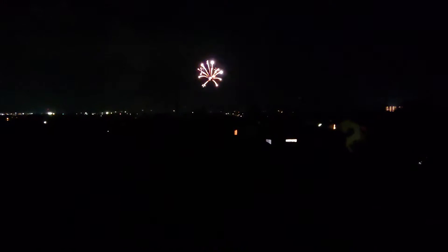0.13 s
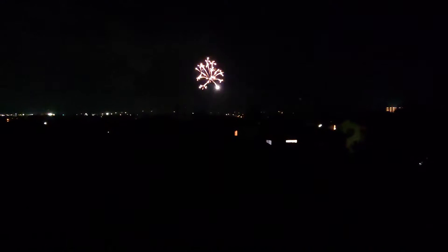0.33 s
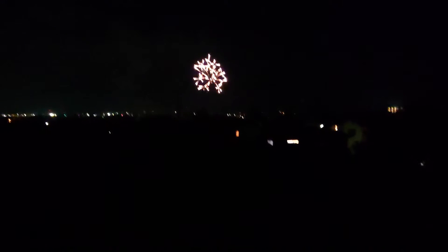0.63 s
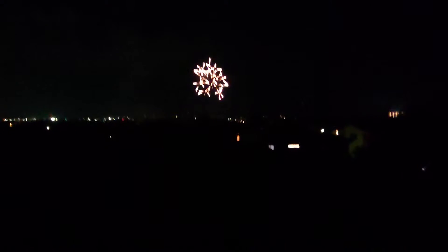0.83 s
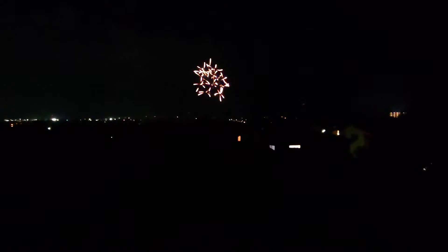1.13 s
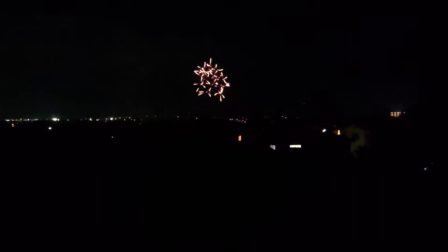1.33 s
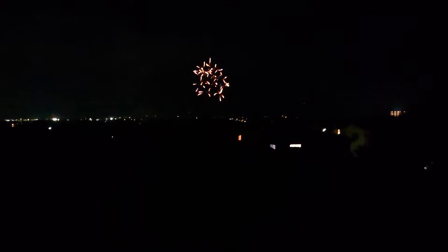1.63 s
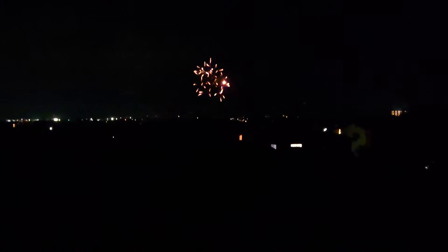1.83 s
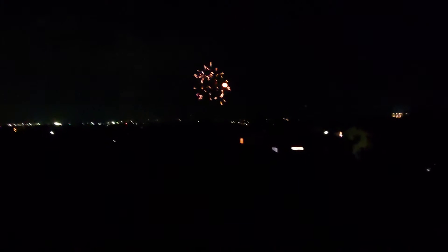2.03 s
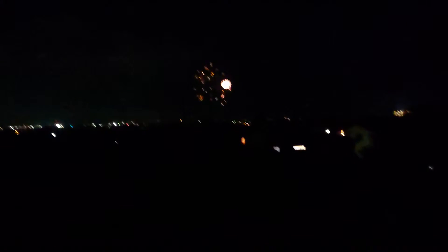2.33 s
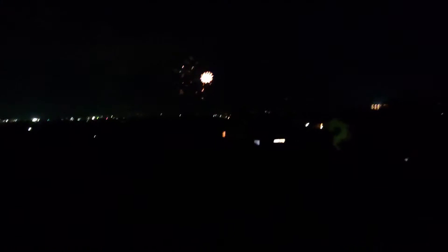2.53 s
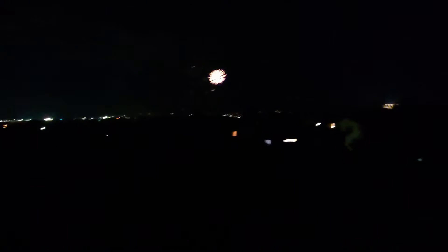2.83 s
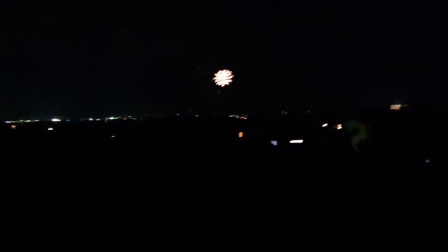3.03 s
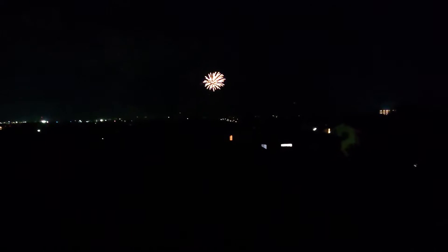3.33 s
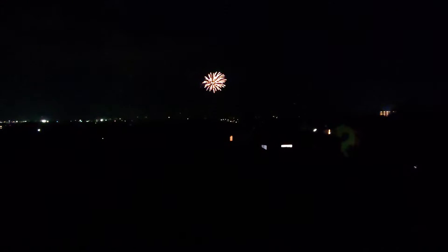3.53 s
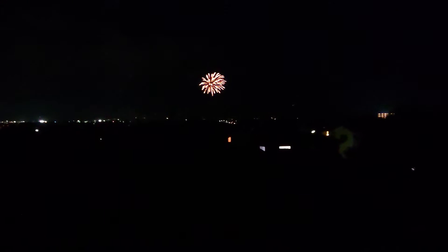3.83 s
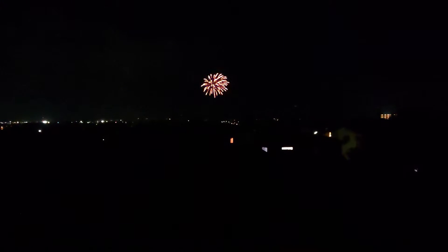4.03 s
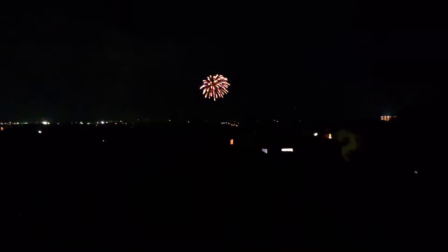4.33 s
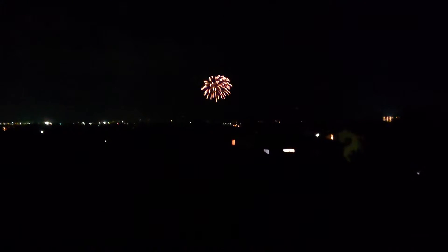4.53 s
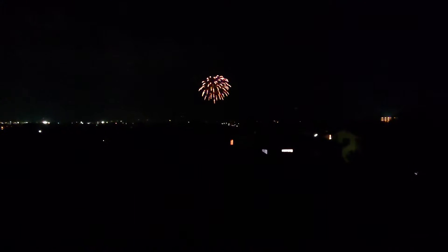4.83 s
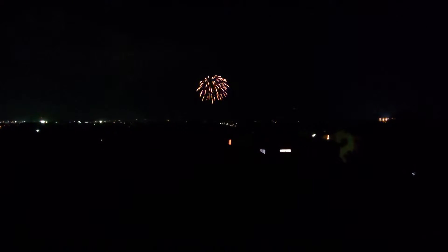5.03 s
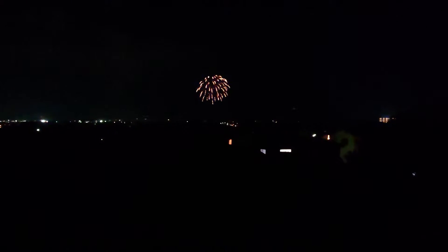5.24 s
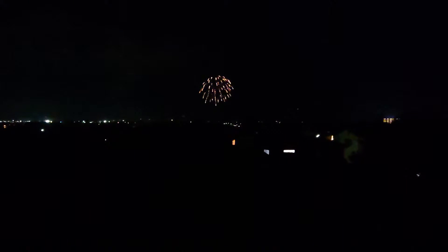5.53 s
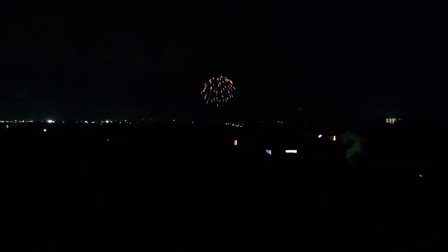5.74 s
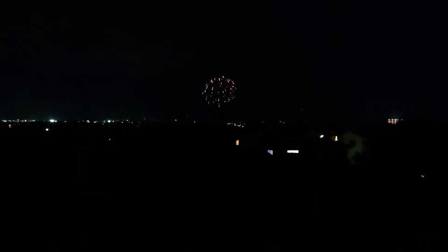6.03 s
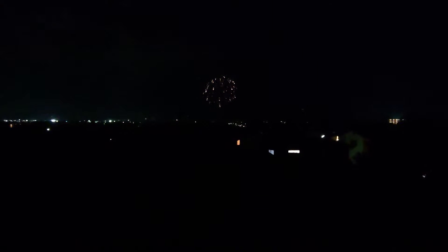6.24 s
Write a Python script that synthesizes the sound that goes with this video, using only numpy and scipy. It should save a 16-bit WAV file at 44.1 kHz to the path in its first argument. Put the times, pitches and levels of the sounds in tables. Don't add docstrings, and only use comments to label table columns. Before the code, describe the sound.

Distant fireworks over a night town: a sharp bang, a rapid volley of pops, another big boom, echoes rolling above crickets and knocks on the phone.

```python
import sys
import numpy as np
from scipy import signal
from scipy.fft import rfft, irfft, next_fast_len
from scipy.io import wavfile
from scipy.ndimage import uniform_filter1d

SR = 44100
rng = np.random.default_rng(int(sys.argv[2]) if len(sys.argv) > 2 else 0)


def file_out(sig):
    cols = np.atleast_2d(sig).T
    lim = np.clip(cols, -1, 1)
    pcm = np.round(lim * 32767).astype(np.int16)
    wavfile.write(sys.argv[1], SR, pcm)


def gain_from_decibels(decibels):
    exponent = np.asarray(decibels, float) / 20
    return 10 ** exponent


N = 281358
T = np.arange(N) / SR


def band(x, hz, width):
    return signal.lfilter(*signal.iirpeak(hz, hz / width, SR), x)


def low(x, hz, order=2):
    return signal.sosfilt(signal.butter(order, hz, fs=SR, output="sos"), x)


def add(out, s, x):
    i = int(round(s * SR))
    out[..., i:i + x.shape[-1]] += x[..., :out.shape[-1] - i]


def walk(rate):
    k = int(SR / rate)
    steps = np.repeat(rng.standard_normal(N // k + 1), k)
    return 1.285 * uniform_filter1d(uniform_filter1d(steps, k), k)[:N]


def hiss(table, lag_ms, flicker_db):
    hz, left_db, right_db, like = np.transpose(table)
    size = next_fast_len(N, real=True)
    f = np.fft.rfftfreq(size, 1 / SR) + 1e-9

    def read(column):
        return np.interp(np.log(f), np.log(hz), column)

    same = np.clip(read(like), 0, 1)
    shared, own = rfft(rng.standard_normal((2, size)))
    lagged = shared * np.exp(-2j * np.pi * f * lag_ms / 1000)
    right = np.sqrt(same) * lagged + np.sqrt(1 - same) * own
    both = np.array([shared * gain_from_decibels(read(left_db)), right * gain_from_decibels(read(right_db))])
    both = both * (f > hz[0]) * (f < hz[-1]) * np.sqrt(SR / 2)
    octave = np.log2(f / hz[0])
    out = 0
    for k in range(int(np.log2(hz[-1] / hz[0]) + .9) + 1):
        part = irfft(both * np.clip(1 - abs(octave - k), 0, 1), size)[:, :N]
        out = out + gain_from_decibels(flicker_db * walk(20)) * part
    return out


def town_hum():
    # pitch_hz, left_db and right_db [dB per Hz], likeness [0-1]
    hum = [(23.7, -100, -100, .8), (50.7, -75, -73, .9), (71, -72.5, -84.5, 0.3), (120, -87.5, -83.5, 0.7),
           (243, -83, -83.5, 1), (498, -92.5, -94, 0.6), (700, -87, -85.5, 1), (926, -91, -92, 0.35),
           (1540, -92, -96, 0), (2190, -95.5, -90.5, 0), (3020, -92.5, -83, 0.18), (3270, -98, -97, 0.2),
           (3610, -89, -91, 0), (4300, -97.5, -106, 0),
           (5000, -94, -100, 0), (5550, -97, -101, 0), (5680, -99, -104, 0)]
    return hiss(hum, lag_ms=.43, flicker_db=.9)


def fringe():
    # from_hz, to_hz, left_db and right_db [dB per Hz], share of time on [0-1]
    strips = [(5680, 5770, -101, -106, .6), (5770, 5900, -105, -109, .4), (5900, 6030, -107, -109, .3),
              (6030, 6200, -111, -116, .1), (8520, 8620, -118, -170, .5), (8620, 8800, -115, -170, .95),
              (8800, 8960, -117, -170, .55), (9250, 9450, -117, -170, .5)]
    out, hold = 0, 1024
    mood = rng.random(N // hold // 2 + 1).repeat(2)
    for lo, hi, left_db, right_db, share in strips:
        chance = (.8 * mood + .2 * rng.random(len(mood))).repeat(hold)[:N]
        gate = uniform_filter1d(1. * (chance < share), size=500)
        out = out + gate * hiss([(lo, left_db, right_db, 0), (hi, left_db, right_db, 0)], 0, 0)
    return out


def machines():
    # pitch_hz, left_db, right_db, wander_hz
    tones = [
        (49.5, -61, -61.5, 1.14),
        (72, -59.5, -60, 1.84),
        (222.3, -65.5, -66, 2.93),
        (1316, -67.5, -84.5, 50),
        (1750, -86, -78, 29),
        (3010, -75, -69.5, 32),
    ]
    # multiple of its pitch, left_db, right_db
    overtones = [(1, -73, -74), (2, -77, -74), (3, -78, -79), (4, -67, -72), (5, -75, -76), (6, -81, -71)]
    whine_hz = 372
    out = 0
    for hz, left_db, right_db, wander in tones:
        swell = gain_from_decibels(1.8 * walk(6))
        tone = swell * np.sin(2 * np.pi * np.cumsum(hz + wander * walk(40)) / SR)
        out = out + gain_from_decibels(np.array([[left_db], [right_db]])) * tone
    turn = 2 * np.pi * np.cumsum(whine_hz + 0.797 * walk(10)) / SR
    for k, left_db, right_db in overtones:
        level = gain_from_decibels(np.array([[left_db], [right_db]]) + 0.66 * walk(9))
        out = out + level * np.sin(k * turn)
    out[1] = np.roll(out[1], 19)
    return out * np.sqrt(2)


def bush_cricket():
    # pitch_hz, left_db and right_db [dB per Hz], likeness [0-1]
    buzz = [(9160, -115, -150, 0.12), (10200, -103, -130, 0), (11170, -93, -107, 0),
            (12160, -89.5, -112, 0), (13400, -83.5, -118, 0.1), (15300, -89, -135, 0.17),
            (15660, -83, -140, 0.03)]
    stroke_hz = 146
    phase = 2 * np.pi * np.cumsum(stroke_hz + 0.326 * walk(2)) / SR
    strong = 0.26 * np.exp(4.3 * (np.cos(phase) - 1)) * np.clip(T / 2.3, .3, 1)
    stroke = 1 + strong + .1 * np.cos(2 * phase)
    return hiss(buzz, 0, 0.34) * stroke / np.sqrt(np.mean(stroke ** 2))


def chirping_cricket():
    chirps = [.0, .34, .68, 1.07, 1.41, 1.75, 2.05, 2.36, 2.71, 3.05, 3.38, 3.79, 4.18, 4.521, 4.89, 5.22,
              5.54, 5.85, 6.19]
    chirp_s, pulse_hz, wing_hz = 0.254, 37.3, 5305
    t = T[:int(chirp_s * SR)]
    pulses = signal.windows.tukey(len(t), .5) * (1 + .7 * np.cos(2 * np.pi * pulse_hz * t))
    envelope = np.zeros(N + SR)
    for s in chirps:
        add(envelope, 1 + s - chirp_s / 2, pulses)
    wing = .06 * gain_from_decibels(2 * walk(12)) * np.sin(2 * np.pi * np.cumsum(wing_hz + 25 * walk(50)) / SR)
    level_db = np.array([-50 + 0.51 * np.minimum(T, 3), -44 + 0 * T])
    return envelope[SR:] * wing * gain_from_decibels(level_db)


def falling_note(length):
    middle_hz, fall_hz_per_s = 3770, 14000
    t = T[:int(length * SR)] - length / 2
    return np.cos(np.pi * t / length) * np.sin(2 * np.pi * (middle_hz * t - fall_hz_per_s * t ** 2 / 2))


def trilling_crickets():
    # first_note_s, notes [count], gap_s
    phrases = [(.036, 2, .066), (.255, 4, .0405), (.53, 2, .043), (.69, 4, .041), (1.006, 1, .04),
               (1.101, 1, .04), (1.203, 2, .044), (1.345, 2, .04), (3.195, 5, .066), (3.531, 6, .0415),
               (3.81, 4, .039), (4.041, 2, .043), (4.199, 5, .041), (4.448, 2, .04), (4.576, 2, .041),
               (4.71, 2, .038), (4.878, 1, .04), (4.947, 3, .037)]
    # time_s, level_db
    loudness = [(0, -58), (.3, -61), (3.1, -58), (3.45, -54), (3.55, -56), (3.9, -56), (5.0, -60)]
    swell_db = 3
    trill = np.zeros(N)
    for s, notes, gap in phrases:
        note = falling_note(.018 + .45 * gap)
        for k in range(notes):
            db = np.interp(s + k * gap, *np.transpose(loudness)) - swell_db * (notes - 1 - k) / notes
            add(trill, s + k * gap + .008 - .22 * gap, gain_from_decibels(db + 1.2 * rng.standard_normal()) * note)
    for k, (shift, size) in enumerate(rng.standard_normal((125, 2))):
        add(trill, .02 + k * .05 + .006 * shift, gain_from_decibels(-66 + 2.5 * size) * falling_note(.035))
    return trill * gain_from_decibels(np.array([[-8], [0]]))


def knocks():
    # start_s, level_db, pitch_hz, cycles [negative pulls first]
    thumps = [(0.726, -13.5, 190, 1.), (0.735, -22.5, 62, 0.9), (.7428, -31, 60, -.6),
              (0.7521, -16.5, 230, 0.9), (0.7552, -21.5, 83.5, -1.1), (0.809, -43, 120, 9),
              (1.92, -30.5, 90, 5.5), (2.294, -37, 111, 6.5), (2.355, -21.5, 106, -2),
              (2.378, -27.5, 186, -1.5), (2.417, -32.5, 130, 6), (2.46, -33, 90, 3), (2.54, -35.5, 99, 3.5),
              (2.645, -34, 112, 1), (2.742, -31.5, 100, 4), (2.885, -18.5, 115, -1.5),
              (2.9411, -31, 180, 3), (3.076, -32, 100, -1.5), (3.7049, -17.5, 172, 0.7),
              (4.471, -36.5, 81.3, 2.5), (4.541, -29, 130, 0.5), (5.469, -25, 118, -1.5),
              (5.689, -43, 200, -1.5), (5.798, -38, 250, 1), (6.165, -43.5, 302, 4),
              (6.331, -41.5, 362, 5.5)]
    # start_s, level_db, pitch_hz
    ticks = [(.724, -23, 920), (.7255, -5.5, 1250), (.7264, -15.5, 1150), (.7428, -30, 800),
             (.753, -18.5, 1700), (.811, -33, 900), (.82, -31, 890), (2.356, -48, 802), (2.379, -33, 800),
             (2.4351, -33.5, 890), (2.461, -39, 796), (2.9432, -22, 903), (2.9434, -24.5, 2200),
             (3.079, -33, 900), (3.096, -18.5, 1530), (3.7048, -19.5, 650), (4.471, -28.5, 793),
             (4.541, -29.5, 700), (4.6, -32, 890), (5.47, -17.5, 700), (5.4697, -23.5, 2900),
             (5.691, -33, 590), (5.799, -32.5, 700)]
    out = np.zeros(N)
    t = T[:int(.07 * SR)]
    for s, db, hz, cycles in thumps:
        u = np.clip(t * hz / abs(cycles), 0, 1)
        thump = np.sin(2 * np.pi * hz * t * (1 - 0.11 * u)) * np.sin(np.pi * u ** 0.32)
        add(out, s, np.sign(cycles) * gain_from_decibels(db) * thump)
    for s, db, hz in ticks:
        tick = -np.sin(2 * np.pi * hz * t) * np.exp(-t * hz / 0.35) * 1.28
        add(out, s, gain_from_decibels(db) * low(tick, min(1.73 * hz, 3700), order=4))
    return out * gain_from_decibels(np.array([[-32], [0]]))


def shock(ms, depth, ground_db, rise_ms, spike_ms, swing):
    t = np.arange(int(0.04 * SR)) * 1000 / SR - rise_ms
    u = np.clip(t / ms, 0, None)
    spike = np.where(t < 0, (1 + t / rise_ms) ** 1.41, np.exp(-(t / spike_ms) ** 2))
    suction = depth * np.sin(np.pi * np.clip(u, 0, 1) ** 0.87) ** 1.3
    late = np.clip(u - 1, 0, None)
    bounce = np.sin(np.pi * (late * swing) ** 0.75) * np.exp(-late / 0.32) * 1.6
    return spike - suction + gain_from_decibels(ground_db) * bounce


def bursts():
    # start_s, peak_db, suction_ms, suction depth [1 = as strong as the push], ground_bounce_db
    shells = [(1.7598, -0.4, 2.8, 0.79, -4.5), (3.0157, -18, 2.7, 0.36, -4),
              (3.0340, -8.5, 1.12, 0.54, -22.5), (3.2384, -11, 2.1, 1.09, -17.5),
              (3.2491, -10.5, 1.75, .9, -14), (3.3075, -15.5, 1.7, 0.8, -19),
              (3.3514, -14.5, 3.6, 0.38, -17), (3.3609, -8, 1.55, 0.88, -8), (3.4022, -24.5, 3.6, 1, 7),
              (3.409, -16, 2.4, .7, -12), (3.4774, -16.5, 2.7, 0.26, -3), (3.5076, -14.5, 2.8, 0.58, -1),
              (3.5278, -15, 2.63, 0.9, -7), (3.5502, -13, 1.67, 1., -21), (5.017, -3.5, 3.74, 0.86, -13.5)]
    direct = np.zeros(N)
    t = T[:int(.02 * SR)]
    for s, db, ms, depth, ground_db in shells:
        front_hz = min(5300 * gain_from_decibels(.4 * db - 7 * (depth - 1.42)), 15000)
        push = shock(ms, depth, ground_db, rise_ms=0.15 + 0.18 * depth, spike_ms=0.56 + .3 * depth, swing=0.89)
        add(direct, s, gain_from_decibels(db) * low(push, front_hz))
        crack = band(rng.standard_normal(len(t)), 2230, 1600) * np.exp(-t / 0.0029)
        add(direct, s + 0.00031, gain_from_decibels(1.31 * db - 8) * low(crack, front_hz))
    return low(direct * gain_from_decibels(-2.22), 4900)


def town_echo():
    # pitch_hz, start_db, quick_t60_s, late_db, late_t60_s
    roll = [(90, -35.5, 0.75, -48.5, 2.16), (200, -32.5, 0.45, -42.5, 2.87), (362, -35.5, 0.41, -41, 3.2),
            (740, -30.5, 0.57, -46, 2.1), (1290, -35, 0.25, -34.5, 1.1), (2320, -28, 0.78, -33.5, 1.4),
            (4330, -21.5, 0.54, -33, 0.46), (5630, -13.5, 0.46, -28, 0.55)]
    t = T[:2 * SR]
    out = np.zeros((2, len(t)))
    fronts = walk(70)[:len(t)]
    for hz, start_db, quick, late_db, late in roll:
        shared, left, right = band(rng.standard_normal((3, len(t))), hz, hz * 0.84) / np.sqrt(hz)
        fade = gain_from_decibels(start_db - 60 * t / quick) + gain_from_decibels(late_db - 60 * t / late)
        apart = min(hz / 2500, .9)
        patches_db = 2.5 * fronts + 2 * walk(60)[:len(t)]
        patchy = gain_from_decibels(3 + patches_db * (.2 + .8 * np.exp(-t / .2)))
        out += fade * patchy * (np.sqrt(1 - apart) * shared + np.sqrt(apart) * np.array([left, right]))
    return gain_from_decibels(8) * out * (1 - np.exp(-(t / 0.024) ** 2))


def smear(ms, db):
    t = T[:int(5 * ms * SR / 1000)]
    out = gain_from_decibels(db) * band(rng.standard_normal((2, len(t))), 2520, 3700) * np.exp(-t * 1000 / ms)
    out[:, 0] = 1
    return out


def echo_paths():
    # delay_ms, level_db, pan_db [left minus right]
    walls = [(4.605, -13.5, 6), (12.86, -21.5, -1), (16.73, -22.5, 7.5), (32.8, -24, -1), (48.4, -36.5, 7),
             (54.6, -26.5, 3), (60.73, -15.5, 2.5), (65.1, -25, 3), (75.1, -25.5, 7), (107.8, -29, 8.5),
             (143.4, -31.5, 4)]
    paths = town_echo()
    t = T[:int(.2 * SR)]
    spray = band(rng.standard_normal((2, len(t))), 2100, 2500) * np.exp(-t / 0.015)
    add(paths, .004, gain_from_decibels(-35) * spray)
    paths[:, 0] = 1
    for ms, db, pan_db in walls:
        side_db = db + np.array([[.5], [-.5]]) * pan_db
        add(paths, ms / 1000, gain_from_decibels(side_db) * low(smear(3.3, -12), 1200, order=1))
    return paths


def fireworks():
    out = signal.oaconvolve(bursts()[None], echo_paths(), axes=1)[:, :N]
    out[1] = np.roll(out[1], 6)
    out += gain_from_decibels(-8) * band(out, 1030, 250)
    out[0] += gain_from_decibels(-8.5) * band(out[0], 3150, 400)
    out[1] += gain_from_decibels(8) * band(out[1], 2710, 1120)
    out[1] -= 0.99 * band(out[1], 4150, 1300)
    out += gain_from_decibels(-5) * band(out, 1950, 350) + gain_from_decibels(-12) * band(out, 670, 180)
    return signal.sosfilt(signal.cheby2(10, 34, 6550, fs=SR, output="sos"), out)


def scene():
    insects = bush_cricket() + chirping_cricket() + trilling_crickets()
    night = town_hum() + fringe() + machines() + insects
    blows = signal.sosfilt(signal.butter(2, 45, "high", fs=SR, output="sos"), fireworks() + knocks())
    return blows + night


def band_limit(x):
    return signal.sosfilt(signal.butter(12, 16310, fs=SR, output="sos"), x)


def record(dry):
    cut = signal.sosfilt(signal.butter(3, 40, "high", fs=SR, output="sos"), dry)
    return band_limit(cut)


dry = scene()
out = record(dry)
file_out(out)
```